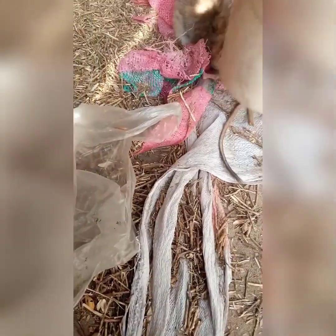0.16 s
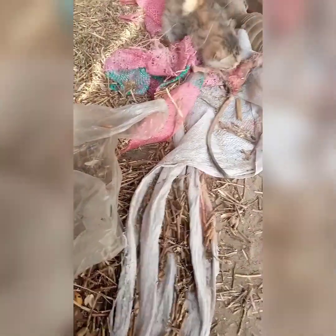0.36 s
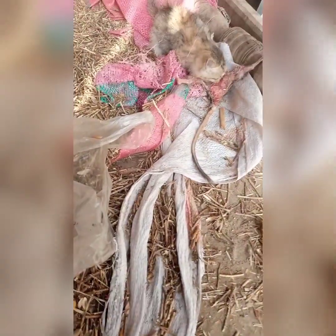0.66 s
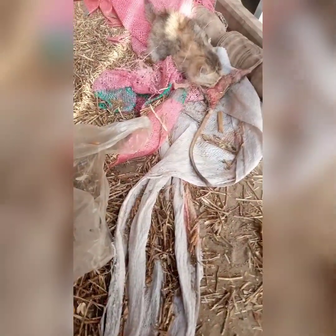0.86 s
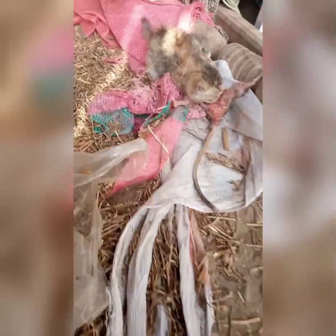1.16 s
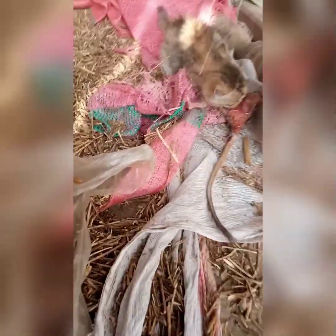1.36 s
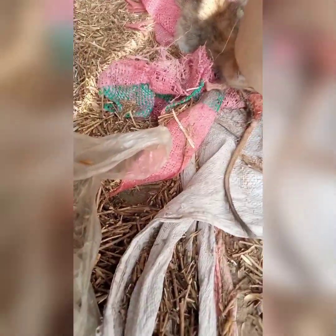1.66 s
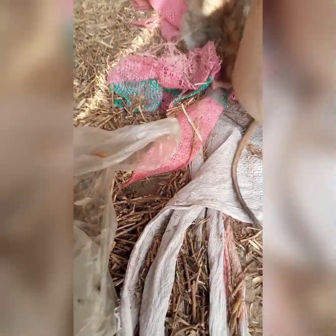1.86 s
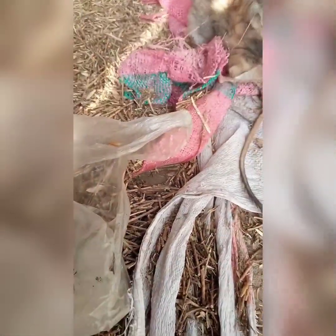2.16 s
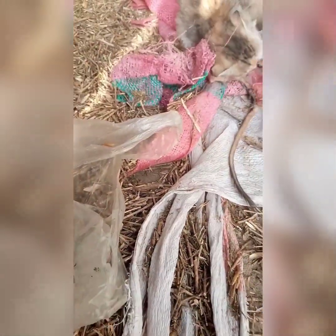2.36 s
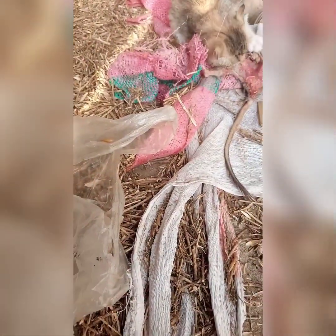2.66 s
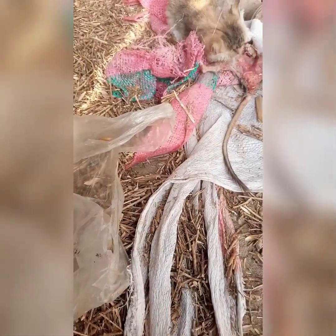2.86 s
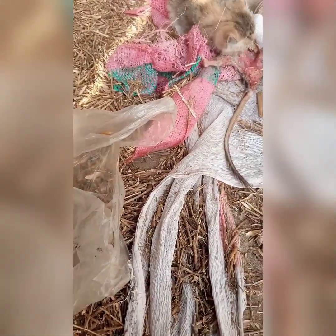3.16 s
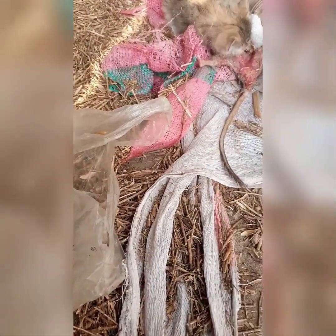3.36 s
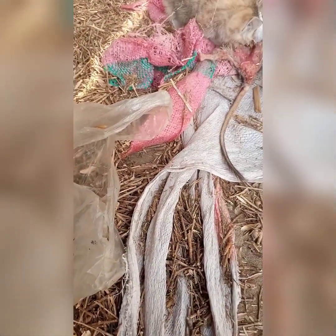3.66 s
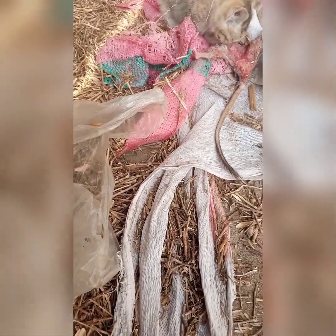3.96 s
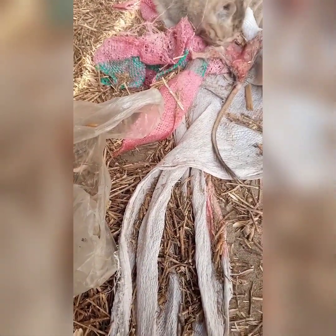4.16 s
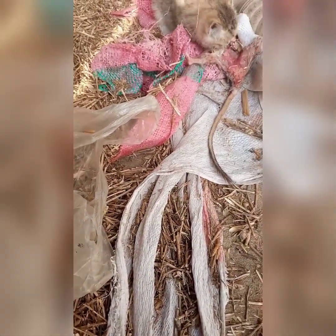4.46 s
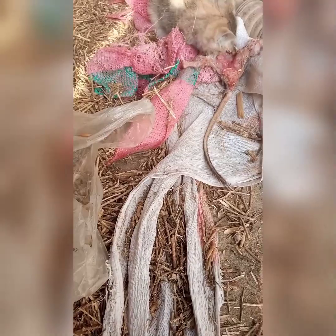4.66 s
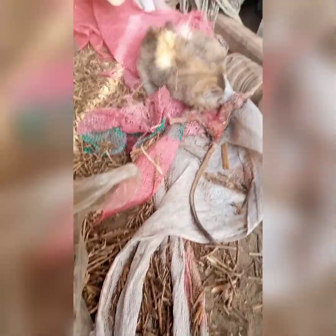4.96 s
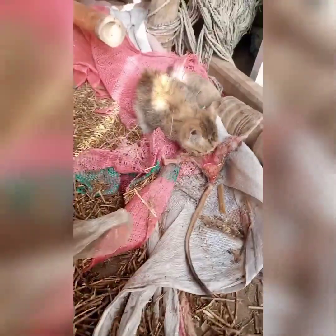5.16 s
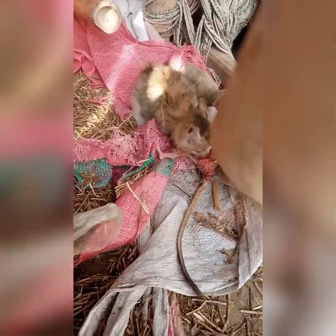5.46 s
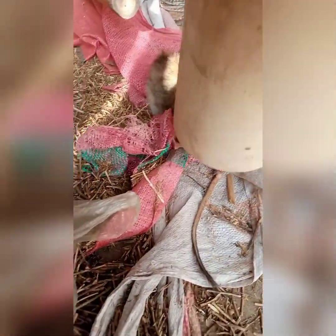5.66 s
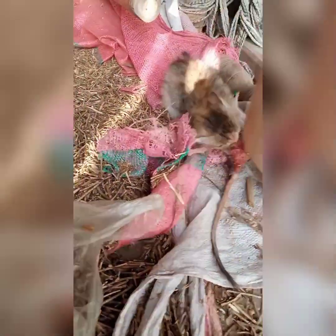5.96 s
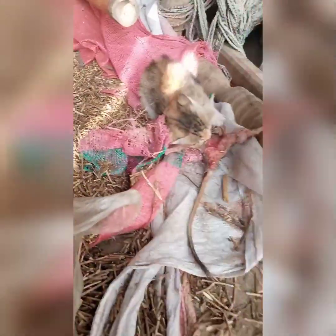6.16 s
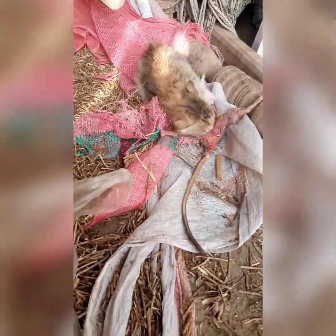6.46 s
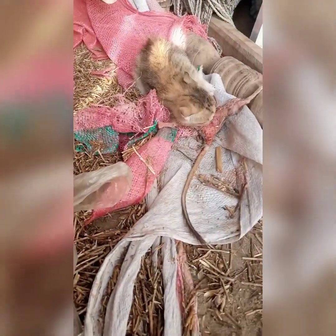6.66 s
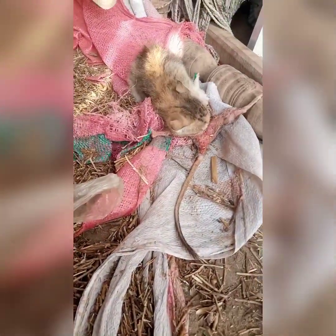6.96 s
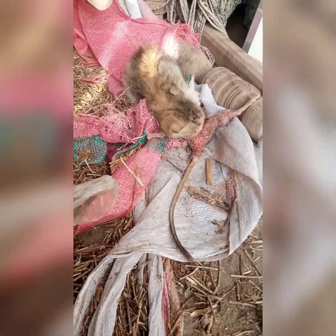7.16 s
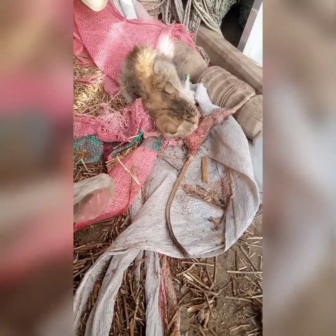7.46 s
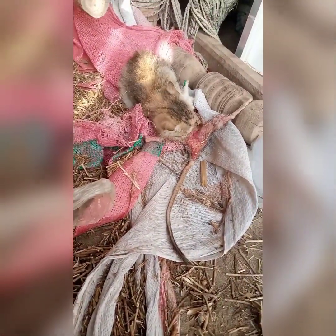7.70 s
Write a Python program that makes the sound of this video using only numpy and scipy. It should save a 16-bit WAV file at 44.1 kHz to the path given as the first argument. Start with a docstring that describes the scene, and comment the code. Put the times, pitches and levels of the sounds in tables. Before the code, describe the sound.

A close cat yowls in drawn-out, hoarse wails, with straw rustling and snapping and a plastic pipe bumping between calls.

```python
"""Cat yowling in the straw

Mono phone microphone close to a cat crouched on rags and straw, walls near by, open air beyond.
Four wails, each hoarse at first, then clearing, shaped by mouth and throat. Between them, also close,
straw and sacking rustle and snap and a plastic pipe bumps and creaks as it rubs.
Far off, birds whistle over a faint wind rumble."""
import sys
import numpy as np
from scipy import signal
from scipy.fft import rfft, irfft
from scipy.io import wavfile
from scipy.ndimage import uniform_filter1d

SR = 44100
rng = np.random.default_rng(int(sys.argv[2]) if len(sys.argv) > 2 else 0)


def unload_audio(sound):
    """Save the sound as a 16-bit wav file, at the path given as the first command line argument."""
    columns = np.transpose(np.atleast_2d(sound))
    # keep every value between -1 and 1, then stretch to whole-number steps
    steps = np.round(np.clip(columns, -1, 1) * 32767)
    wavfile.write(sys.argv[1], SR, steps.astype(np.int16))


N = 345303

# spectra of open air, wind, dry straw and the microphone's self-noise: f/Hz, level/dB
AIR_SPECTRUM = [(88, -30), (150, 1), (340, -8), (405, -19), (646, -7.5), (740, -29.5), (899, -11),
                (1740, -22.5), (2380, -17.5), (2620, -26.5), (3650, -34.5), (5080, -18.5), (8260, -41),
                (15700, -33)]
WIND_SPECTRUM = [(12, -61), (20, -32.5), (22, -29.5), (35, -13.5), (45, -1), (65, 3), (121, -6),
                 (200, -20.5), (260, -51), (440, -120)]
STRAW_SPECTRUM = [(180, -43.5), (300, -10.5), (493, -7), (572, -12), (698, -6), (1000, -20), (1130, -11.5),
                  (2220, -5), (2900, -11), (6530, 1), (7830, -12.5), (10000, -23.5), (13500, -47.5),
                  (14900, -28.5), (15700, -33)]
HISS_SPECTRUM = [(4410, -40.5), (7500, -11), (8230, -14.5), (10200, -15.5), (13700, -11.5), (14900, 1),
                 (15700, -1.5)]
AIR_DB, HISS_DB = -71.5, -88.5
# course of the wind: t/s, level/dB
GUSTS = [(0.0, -53), (0.57, -78.5), (1.42, -60.5), (1.53, -69), (2.36, -70.5), (3.12, -57.5), (3.34, -65.5),
         (5.04, -68.5), (5.12, -66), (5.84, -63.5), (6.3, -65), (7.83, -67.5)]
# straw and sacking shifting: t/s, rise/s, hold/s, body level/dB, t60/s,
# then against the body: dull/dB, crisp/dB, fizz/dB
RUSTLES = [(0.0, 0.0033, 0.043, -69, .2, 0, -2, -30), (0.043, .04, 0.016, -55, 0.31, 4, 4, -2),
           (0.14, 0.028, 0.1, -64, 0.51, 2.5, 2, -15), (1.871, 0.019, .01, -64.5, 0.23, 19.5, 11, -2.5),
           (2.756, .005, 0.024, -58.5, 0.76, 1.5, 5.5, -23),
           (2.943, .004, 0.058, -55, 0.091, 4.5, 0.5, -17),
           (3.079, 0.0063, 0.034, -52.5, 0.38, -10, -12, -7),
           (3.152, 0.0073, 0.011, -57.5, 0.22, 15, 6.5, -3), (3.374, .1, .03, -63.5, .45, -1.5, 8.5, -18),
           (3.593, 0.0042, 0.0031, -55.5, 0.19, -1, -0.5, -1.5),
           (3.739, 0.0038, 0.047, -57.5, 0.17, -7.5, -1.5, -19), (3.831, .003, .003, -59.5, 0.33, 2, 4, 3),
           (3.9, 0.049, 0.83, -81.5, .6, 3.5, -31.5, -23.5), (4.04, .01, .021, -76.5, 0.72, 5.5, -8, -23),
           (4.436, .06, .021, -72.5, .4, -12.5, 0, -18), (4.785, .006, .021, -75, .8, 5, -17, -24.5),
           (4.923, 0.16, .003, -65.5, .1, -0.5, -27.5, -24), (5.053, 0.021, 0.015, -50, 0.23, 8.5, 9.5, 3),
           (5.275, 0.0062, 0.042, -55, 0.091, -12, -16, -49),
           (5.317, 0.0084, 0.17, -44, 0.36, -0.5, 4.5, 1.5), (5.665, 0.03, .08, -67, 0.14, 12, 1.5, -28),
           (5.776, 0.023, .01, -57.5, 0.48, 6.5, 4.5, 0), (5.998, 0.041, 0.046, -40, 0.29, -5, -0.5, -27),
           (6.111, .01, 0.039, -51.5, 0.095, -30, 7, -27), (6.2, .1, .003, -61.5, .2, 0.5, -5, -16),
           (7.099, 0.0035, 0.015, -80.5, 0.21, 23.5, -2.5, -18),
           (7.26, 0.01, 0.0032, -78, 0.42, 8.5, 8.5, -26)]
# pipe hitting the ground: t/s, ring level/dB, then against the ring: knock/dB, thud/dB
BUMPS = [(0.06, -46, -41, 7), (1.847, -22.5, -56, -19.5), (1.887, -30.5, 11, -7), (2.949, -40.5, 7, 14.5),
         (2.972, -38.5, -21, -2), (3.008, -50.5, -18, 8), (3.094, -14.5, -30, -16), (3.153, -43, -22, 2),
         (3.166, -33.5, -1.5, 1), (5.099, -51.5, -42, 21), (5.771, -11.5, -43, -16), (5.81, -32, 6, 1.5),
         (5.86, -41.5, 2.5, -24), (6.027, -58, 15, -23.5), (6.687, -21, -27.5, -10)]
# modes of the hollow pipe: f/Hz, level/dB, t60/s
PIPE_MODES = [(203.6, 3, 0.95), (342, 14.5, 0.015), (498, 1, 0.093), (690, -42, 0.1)]
# stalks breaking: t/s, level/dB, ring f/Hz, relative tick level/dB, splinter t60/s
SNAPS = [(0.0787, -44, 6730, -23, 0.03), (2.807, -48, 4060, -37, 0.03), (2.8161, -36, 6320, -39, 0.021),
         (2.8648, -37, 6600, -20, 0.017), (2.8924, -23.5, 5270, -26, 0.014), (2.949, -19, 4280, -36, 0.066),
         (2.9726, -25, 3400, -31, 0.027), (2.999, -31, 6640, -33, 0.03), (3.0876, -25.5, 5000, -1, 0.033),
         (3.092, -18.5, 3700, -28, 0.044), (3.167, -19.5, 4560, -35, 0.056),
         (3.1854, -24, 4670, -37, 0.042), (3.4457, -33.5, 6460, -22, 0.016), (3.5713, -27, 6380, -9, 0.014),
         (3.5939, -20, 5470, -14, 0.051), (3.742, -32, 4960, -4, 0.03), (3.776, -34, 6560, -33, 0.039),
         (3.819, -44, 6380, -20, 0.027), (3.838, -26, 4800, -10, 0.032), (3.956, -48.5, 4690, -28.5, 0.03),
         (4.0532, -48.5, 6400, -13, 0.029), (4.0972, -51, 3920, -28, 0.026),
         (4.1416, -40, 6930, -27.5, 0.03), (4.1594, -48, 3580, -29, 0.038), (4.43, -45, 5720, -27, 0.033),
         (4.5024, -39.5, 6800, -23, 0.03), (4.5173, -33, 6560, -40, 0.015),
         (4.738, -41.5, 7040, -34, 0.022), (4.798, -40, 5480, -42, 0.03), (5.0636, -21, 4440, -23.5, 0.04),
         (5.1398, -31, 4130, -28, 0.024), (5.2835, -32, 5800, -7, 0.014), (5.325, -17.5, 6530, -15, 0.021),
         (5.458, -14, 6600, -24, 0.026), (5.547, -30.5, 6380, -6, 0.093), (5.7643, -23.5, 6060, -29, 0.019),
         (3.757, -42, 5200, -25, .02), (3.787, -37, 5600, -23, 0.021), (3.797, -41, 5000, -24, .02),
         (3.908, -50, 4500, -21, .02), (4.39, -54, 6010, -22, .02), (4.848, -55, 6010, -15.5, .02),
         (5.809, -32, 1510, -29, 0.025), (5.858, -38, 2500, -31, 0.034), (3.252, -42, 3500, -30, 0.033),
         (3.303, -47, 3480, -25.5, 0.028), (6.6866, -11, 3710, -29, 0.015),
         (7.1272, -35, 5970, -16.5, 0.026), (7.2679, -48, 6110, -25, 0.03)]
# the voice, one table a wail: t/s, pitch/Hz, fundamental/dB, mouth resonance/partial number,
# throat ring against it/dB, partials 2-4/dB, higher ones below the notch/dB, those past it/dB
WAILS = [
    [(0.297, 430, -29, 0.99, -14, -25, -47, -55), (0.313, 525, -27, 3.4, -12, -22.5, -31, -46.5),
     (0.357, 653, -25.5, 3.7, -8, -17.5, -17.5, -71), (0.375, 645, -36, 2.45, 0, -23, -20.5, -72),
     (0.397, 621, -33.5, 2.68, 18.5, -19.5, -24, -73), (0.455, 729, -30.5, 2.68, 4, -15, -20.5, -47),
     (0.561, 790, -30, 2.45, -5, -12.5, -19.5, -54), (0.605, 798, -31, 2.49, -15, -15.5, -15, -43),
     (0.695, 700.4, -28, 2.68, -10, -13.5, -26, -51), (0.795, 713.4, -26, 2.54, -34, -20.5, -53, -65),
     (0.845, 680, -26, 2.8, -27, -23, -40, -55), (1.013, 662.2, -25, 3.01, -20, -29.5, -43.5, -54.5),
     (1.251, 706.7, -25, 2.68, -12, -26.5, -42, -56.5), (1.295, 712.3, -26.5, 2.47, -15, -33, -51.5, -60),
     (1.363, 730.5, -28.5, 2.83, -25, -22.5, -42.5, -60.5), (1.415, 765, -31, 2.61, -16, -25, -45.5, -67),
     (1.525, 696, -27, 2.67, -14.5, -24, -48, -79), (1.553, 661, -25, 2.7, -19, -21, -45.5, -63.5),
     (1.587, 690.3, -26.5, 2.73, -19, -24, -40, -68), (1.783, 730, -28, 2.71, -5, -23, -51, -64),
     (1.853, 716.5, -29.5, 2.68, -8.5, -28, -54, -68), (1.885, 722, -53, 3.6, -10, -32, -57, -68)],
    [(2.135, 478.7, -55, 2.5, -6, -31.5, -74, -94.5), (2.145, 521, -31.5, 2.5, 17, -30.5, -47, -78),
     (2.177, 629, -32, 2.41, 6, -28, -31.5, -67), (2.231, 680, -31.5, 2.5, 3, -23.5, -29, -58),
     (2.271, 699, -35, 2.52, 0.5, -22.5, -26, -59), (2.315, 743, -31.5, 2.44, -1.5, -21.5, -24.5, -56.5),
     (2.423, 753.3, -31, 2.53, 4, -18.5, -19.5, -59), (2.499, 762, -30, 2.52, 2.5, -15, -17.5, -52.5),
     (2.581, 783.3, -33.5, 2.62, -18, -17, -26.5, -52), (2.653, 769.3, -29.5, 2.1, -35, -25, -41.5, -50.5),
     (2.707, 780, -39.5, 2, -15.5, -34, -59, -77), (2.763, 762, -24, 2.45, -19, -37, -49, -64),
     (2.775, 736, -49, 1.87, -22, -35, -41, -58)],
    [(6.385, 680, -33, 2.4, -11, -40.5, -69, -88), (6.397, 571, -25, 2.37, -4.5, -24.5, -50, -64),
     (6.407, 600, -24.5, 2.64, -10.5, -21, -46.5, -74), (6.429, 708, -24, 2.85, -22.5, -14, -33.5, -54),
     (6.445, 810, -36.5, 2.49, -29.5, -18.5, -39.5, -59), (6.559, 843, -28, 2.36, -19.5, -11, -28, -47.5),
     (6.667, 795, -33.5, 2.51, -24, -13.5, -30.5, -44.5),
     (6.695, 744, -27.5, 2.55, -26.5, -15.5, -30, -48.5),
     (6.795, 739.6, -30, 2.19, -14.5, -21, -58.5, -57.5), (7.003, 735, -33, 2.36, -12.5, -30, -55.5, -66),
     (7.059, 774, -38, 2.1, -22, -39.5, -80, -82), (7.101, 732, -38.5, 2.36, -1, -52, -81, -92),
     (7.123, 729, -42, 2.73, -5, -46.5, -75, -51), (7.14, 752, -62, 2.4, -4.5, -52, -60, -64)],
    [(7.455, 785, -41.5, 2.4, -13.5, -54, -85, -91.5), (7.471, 764, -38.5, 2.1, -7, -49.5, -90, -89),
     (7.513, 908, -38, 1.92, -12, -36, -75, -69), (7.549, 993, -43.5, 2.23, -13, -46, -70, -57.5),
     (7.599, 1019, -53, 1.9, -15, -32.5, -62, -60), (7.637, 983, -37.5, 1.7, -22, -33.5, -63, -59),
     (7.659, 931, -39.5, 1.93, -23, -32, -57.5, -84), (7.737, 887.0, -40.5, 1.5, -23, -33, -76, -92),
     (7.773, 830, -42, 1.8, -21, -41.5, -92, -100), (7.795, 843, -48, 2.23, -28, -43.5, -82, -103),
     (7.83, 827, -48, 1.4, -24, -47, -74, -90)],
]
# colour of the partials above the fourth, mouth open and nearly shut: f/Hz, level/dB
MOUTH_OPEN = [(1940, -34.5), (3300, 5), (4220, -10), (4830, 0), (5090, -8), (5430, -1), (5800, -16),
              (6220, -7.5), (7800, -27.5), (8550, -36), (10200, -36), (12400, -55), (15500, -54.5)]
MOUTH_SHUT = [(1940, -18.5), (3300, 3), (3680, 3.5), (4060, -4.5), (4330, -15), (4680, -7), (5290, -11),
              (6770, -0.5), (8060, -22.5), (9060, -15.5), (10200, -11), (10700, -20.5), (15500, -45)]
# throat resonance, one a wail: f/Hz
THROAT_RING_HZ = [3340, 3210, 3140, 3900]
MOUTH_DB_PER_OCT, RING_DB_PER_OCT, NOTCH_HZ = 36, 47.5, 8100
# hoarse start of each wail: length/s, first rasp/dB, last rasp/dB (against the fourth partial)
HOARSE_STARTS = [(.135, 9, 1), (.28, -4, -12), (.055, -12, -11), (.045, -20, -21)]
CLEARING_S, CLEAR_RASP_DB = .03, -27
# catches in the throat: t/s, half length/s, rasp/dB, exponent of growth with partial number
CATCHES = [(.76, 0.0088, -13.5, -.3), (0.35, 0.0066, -18, -.6), (1.395, 0.14, -17.5, 1.4),
           (1.881, 0.082, -1.5, 1.1), (2.784, 0.037, 0, .2), (6.619, .012, -25.5, .1),
           (6.706, 0.041, -10, 1.4), (6.98, .03, -15, 1.2), (7.01, .014, -15, .2), (1.0, .03, -24, 1.6),
           (1.55, 0.11, -26.5, .9), (.61, .04, -26.5, 1.6), (7.14, .08, 2.5, .9)]
# distant birds: t/s, length/s, first f/Hz, last f/Hz, level/dB
WHISTLES = [(1.975, 0.11, 4320, 4660, -62.5), (4.009, 0.034, 6380, 6320, -63),
            (4.07, 0.073, 4450, 3900, -73.5), (4.139, 0.035, 3800, 3520, -68),
            (4.454, 0.068, 5120, 3530, -56.5), (4.572, 0.016, 1160, 1310, -62),
            (4.875, 0.2, 4270, 3880, -66.5), (5.154, 0.14, 3530, 4700, -58),
            (5.898, 0.12, 3020, 3630, -67.5), (6.175, 0.24, 1370, 1463, -60.5),
            (7.637, 0.23, 3290, 5140, -53.5), (3.379, 0.23, 1490, 2043, -64.5),
            (4.585, 0.0674, 4200, 5000, -73), (4.936, .11, 5300, 5480, -85)]
# pipe rubbing, one table a creak: t/s, slip rate/Hz, level/dB
CREAKS = [
    [(5.395, 510, -40.5), (5.42, 450, -57), (5.45, 390, -66)],
    [(5.672, 450, -39), (5.698, 370, -29.5), (5.72, 440, -38.5), (5.744, 600, -47.5), (5.77, 370, -40)],
    [(6.022, 630, -30.5), (6.045, 720, -42.5), (6.07, 760, -38)],
]


def gain_of(db):
    """Decibels to gain."""
    return 10 ** (np.asarray(db) / 20)


def unit_rms(x):
    """Scales to rms 1."""
    return x / np.sqrt(np.mean(x ** 2) + 1e-20)


def level_at(spectrum, hz):
    """Reads a spectrum in dB on a log-frequency axis."""
    f, db = np.transpose(spectrum)
    return np.interp(np.log(hz + 1), np.log(f + 1), db)


def add(mix, start, sound):
    """Mixes a sound in at a time in seconds."""
    part = mix[round(start * SR):][:len(sound)]
    part += sound[:len(part)]


def unroll(rows):
    """Sample times and every column of a curve."""
    times, *columns = np.transpose(rows)
    t = np.arange(times[0], times[-1], 1 / SR)
    return t, [np.interp(t, times, column) for column in columns]


def coloured(x, spectrum, lo_hz=0, hi_hz=SR):
    """Gives x a spectrum between two soft edges, rms 1."""
    hz = np.fft.rfftfreq(len(x), 1 / SR)
    edges = 1 / (1 + (lo_hz / (hz + 1)) ** 8) / (1 + (hz / hi_hz) ** 12)
    return unit_rms(irfft(rfft(x) * gain_of(level_at(spectrum, hz)) * edges, len(x)))


def drift(size, hz, count=1):
    """Smooth random wander up to a rate, rms 1; count tracks at once."""
    steps = np.arange(size) * hz * 2 / SR
    knots = rng.standard_normal((count, int(steps[-1]) + 2))
    whole = steps.astype(int)
    blend = np.sin((steps - whole) * np.pi / 2) ** 2
    return np.squeeze(unit_rms(knots[:, whole] + np.diff(knots)[:, whole] * blend))


def resonate(x, hz, width_hz, passes=1):
    """A resonance that can glide: each pass shifts hz down to zero, smooths, and shifts back."""
    carrier = np.exp(2j * np.pi * np.cumsum(hz * np.ones(len(x))) / SR)
    pole = np.exp(-np.pi * width_hz / SR)
    for _ in range(passes):
        x = 2 * (carrier * signal.lfilter([1 - pole], [1, -pole], x / carrier + 1e-18)).real
    return x


def air_and_wind():
    """The bed of the place: faint steady air and a lumpy low wind."""
    air = gain_of(AIR_DB + drift(N, 3.9)) * coloured(rng.standard_normal(N), AIR_SPECTRUM)
    gust_db = np.interp(np.arange(N) / SR, *np.transpose(GUSTS)) + 2 * drift(N, 4.9)
    return air + gain_of(gust_db) * coloured(rng.standard_normal(N), WIND_SPECTRUM, hi_hz=200)


def straw_rustle():
    """Dry stalks and cloth, close: dense tiny clicks of unequal size, in clumps."""
    t = np.arange(N) / SR
    clicks = rng.standard_normal(N) * gain_of(2.2 * rng.exponential(1, N) + 2.4 * drift(N, 90))
    edges_hz = [(4400, 5600), (330, 4290), (5860, 12900), (11800, SR)]  # body, dull, crisp, fizz
    fade_rates = [1, .88, 1.57, 1.6]
    bands = [coloured(clicks, STRAW_SPECTRUM, *edges) for edges in edges_hz]
    power = np.zeros((len(bands), N))
    for start, rise, hold, db, t60, *against_db in RUSTLES:
        attack = np.clip((t - start) / rise, 0, 1)
        decay_db = 60 * np.maximum(t - start - rise - hold, 0) / t60
        for band_power, band_db, rate in zip(power, [0, *against_db], fade_rates):
            band_power += (attack * gain_of(db + band_db - rate * decay_db)) ** 2
    return (np.sqrt(power) * bands).sum(0)


def patchy(x, depth_db):
    """Lets patches of a noise, some hundred hertz by some tens of ms, come and go."""
    frames = dict(nperseg=256, noverlap=192)
    spectra = signal.stft(x, **frames)[2]
    patches = uniform_filter1d(rng.standard_normal(spectra.shape), 4, axis=0)
    patches = unit_rms(uniform_filter1d(patches, 24, axis=1))
    return signal.istft(spectra * gain_of(depth_db * patches), **frames)[1][:len(x)]


def pipe_bump(start, db, knock_db, thud_db):
    """The hollow pipe rings low; a short mid knock rides on top and the ground thuds below."""
    t = np.arange(4096) / SR
    detunes = rng.uniform(.875, 1.22, len(PIPE_MODES))
    ring = sum(gain_of(mode_db - 60 * t / min(t60, .12)) * np.sin(2 * np.pi * hz * detune * t)
               for detune, (hz, mode_db, t60) in zip(detunes, PIPE_MODES))
    knock = resonate(rng.standard_normal(len(t)), 870, 830, passes=2) * gain_of(-60 * t / .059)
    thud = resonate(rng.standard_normal(len(t)), 153, 76) * gain_of(-60 * t / .074)
    thud *= 1 - np.exp(-t / .0046)
    ring, knock, thud = (part / abs(part).max() for part in (ring, knock, thud))
    bump = ring + gain_of(min(knock_db, 6)) * knock + gain_of(thud_db) * thud
    return start - .001, gain_of(db) * bump


def straw_snap(start, db, hz, tick_db, t60):
    """A stalk breaks: a short ring set by its size, a bright tick and a scatter of splinters."""
    t = np.arange(4000) / SR
    ring, tick, splinters = rng.standard_normal((3, len(t)))
    ring = unit_rms(resonate(ring, hz, 1100, passes=2)) * gain_of(-60 * t / .011)
    tick = coloured(tick, STRAW_SPECTRUM, 8000, 13000) * gain_of(tick_db - 60 * t / .008)
    splinters = coloured(splinters, STRAW_SPECTRUM, 940, 8500) * gain_of(-15 - 60 * t / t60)
    attack = 1 - np.exp(-t / .00025)
    return start, gain_of(db) * (.76 * ring + .6 * tick + splinters) * attack


def vowel(order, ring_hz, hz, mouth_partial, ring_db, *levels_db):
    """Strength of each partial: mouth and throat resonances below, open or shut colour above."""
    partial_hz = order * hz
    opening = np.clip((levels_db[2] + 39) / 18, 0, 1)  # the wider the mouth, the brighter
    upper_db = opening * level_at(MOUTH_OPEN, partial_hz)
    upper_db += (1 - opening) * level_at(MOUTH_SHUT, partial_hz)
    mouth = gain_of(-MOUTH_DB_PER_OCT * abs(np.log2(order / mouth_partial)))
    ring = gain_of(ring_db - RING_DB_PER_OCT * abs(np.log2(partial_hz / ring_hz)))
    upper = order > 4
    colour = np.where(upper, gain_of(upper_db), mouth + ring)
    past_notch = 1 / (1 + (NOTCH_HZ / partial_hz) ** 30)
    groups = [order == 1, (order > 1) & ~upper, upper * (1 - past_notch), upper * past_notch]
    return sum(gain_of(db) * colour * group / np.linalg.norm(colour * group + 1e-6, axis=0)
               for db, group in zip(levels_db, groups))


def hoarseness(t, order, length, first_db, last_db):
    """Rasp of each partial: strong through the hoarse start, it clears, and flares at each catch."""
    start_db = np.interp(t - t[0], [0, length, length + CLEARING_S], [first_db, last_db, CLEAR_RASP_DB])
    rasp = gain_of(start_db) * (order / 4) ** 1.4  # the higher the partial, the more it spreads
    for centre, half_length, db, growth in CATCHES:
        flare = np.clip(1 - abs(t - centre) / half_length, 0, 1) ** 2
        rasp += gain_of(db) * flare * (order / 4) ** growth
    return rasp


def cat_wail(rows, hoarse_start, ring_hz):
    """The cat, close: partials throb each on its own; hoarse folds shake pitch and strength."""
    t, (hz, first_db, mouth_partial, ring_db, *upper_db) = unroll(rows)
    n, order = len(t), np.arange(1, 18)[:, None]
    slow_t, *shape = (curve[::64] for curve in (t, hz, mouth_partial, ring_db, first_db, *upper_db))
    strength = np.array([np.interp(t, slow_t, row) for row in vowel(order, ring_hz, *shape)])
    rasp = np.array([np.interp(t, slow_t, row) for row in hoarseness(slow_t, order, *hoarse_start)])
    hoarse = np.minimum(rasp[3], 1)
    cycles = np.cumsum(hz * (1 + .0046 * drift(n, 28) + .03 * hoarse * drift(n, 200))) / SR
    throb = np.minimum(.037 + .14 * (order - 1), .45)  # the fundamental is steadiest
    roughness = unit_rms(drift(n, 420, len(order)) + .6 * drift(n, 160, len(order)))
    shake = throb * drift(n, 40, len(order)) + rasp * roughness
    strength *= (1 + shake) / np.sqrt(1 + throb ** 2 + rasp ** 2)
    voice = np.sqrt(2) * (strength * np.cos(2 * np.pi * (order * cycles - .062 * order ** 2))).sum(0)
    voice *= 1 + .12 * hoarse * drift(n, 80)  # the whole rasp flutters
    voice *= 1 + .16 * hoarse * np.cos(np.pi * cycles + 1.5 * drift(n, 40))  # strong, weak cycles in turn
    small_head = signal.butter(4, 420, "high", fs=SR, output="sos")  # radiates no bass
    voice = signal.sosfilt(small_head, voice)
    breath = coloured(rng.standard_normal(n), STRAW_SPECTRUM, lo_hz=13000)  # air past the teeth
    voice += breath * hoarse * gain_of(upper_db[1] - 37.5)
    return t[0], voice * signal.windows.tukey(n, .0051 / (t[-1] - t[0]))


def bird_whistle(start, length, first_hz, last_hz, db):
    """A far gliding whistle, blurred by the air on its way."""
    noise = rng.standard_normal(SR // 4)[:round(length * SR)]
    hz = np.geomspace(first_hz, last_hz, len(noise))
    whistle = unit_rms(resonate(noise, hz, width_hz=240, passes=2))
    return start, gain_of(db) * whistle * signal.windows.tukey(len(noise), .45)


def pipe_creak(rows):
    """The pipe rubs: stick-slip pulses, slightly uneven, dulled by the plastic wall."""
    t, (hz, db) = unroll(rows)
    cycles = np.cumsum(hz * (1 + .05 * drift(len(t), 149.4))) / SR
    slips = sum(gain_of(partial_db) * np.cos(2 * np.pi * order * cycles)
                for order, partial_db in enumerate([-3, -3.5, -12, -18, -30], 1))
    envelope = gain_of(db + drift(len(t), 110)) * signal.windows.tukey(len(t), .1)
    return t[0], envelope * unit_rms(slips)


def reflections(x, t60):
    """Returns from walls and heaps: sparse taps of random sign dying away."""
    taps = np.zeros(9000)
    delays = np.arange(150, 8960, 20) + rng.integers(0, 20, 441)
    taps[delays] = rng.choice([-1., 1.], len(delays)) * gain_of(-60 * delays / SR / t60)
    return signal.oaconvolve(x, taps / np.linalg.norm(taps))[:N]


def scene():
    """At the microphone: cat, straw and pipe close and mostly direct, far birds mostly echo, open air."""
    cat, near, birds = np.zeros((3, N))
    for call in zip(WAILS, HOARSE_STARTS, THROAT_RING_HZ):
        add(cat, *cat_wail(*call))
    for row in SNAPS:
        add(near, *straw_snap(*row))
    for row in BUMPS:
        add(near, *pipe_bump(*row))
    for rows in CREAKS:
        add(near, *pipe_creak(rows))
    for row in WHISTLES:
        add(birds, *bird_whistle(*row))
    echoes = gain_of(-14) * reflections(cat, t60=.14) + gain_of(-13) * reflections(near, t60=.22)
    birds = .6 * birds + reflections(birds, t60=.2)
    rustle = patchy(straw_rustle(), depth_db=1.6)
    return (cat + near + echoes + birds + rustle + air_and_wind())[None]


def record(dry):
    """The phone's small microphone hisses, loses deep bass and rounds peaks; the top is band-limited."""
    hiss = gain_of(HISS_DB) * coloured(rng.standard_normal(N), HISS_SPECTRUM)
    thin = signal.sosfilt(signal.butter(4, 52, "high", fs=SR, output="sos"), dry + hiss)
    rounded = thin / (1 + (thin / .95) ** 4) ** (1 / 4)
    band_limit = signal.firwin(511, 15800, window=("kaiser", 9), fs=SR)
    return signal.oaconvolve(rounded, band_limit[None], "same")


dry = scene()
out = record(dry)
unload_audio(out)
```